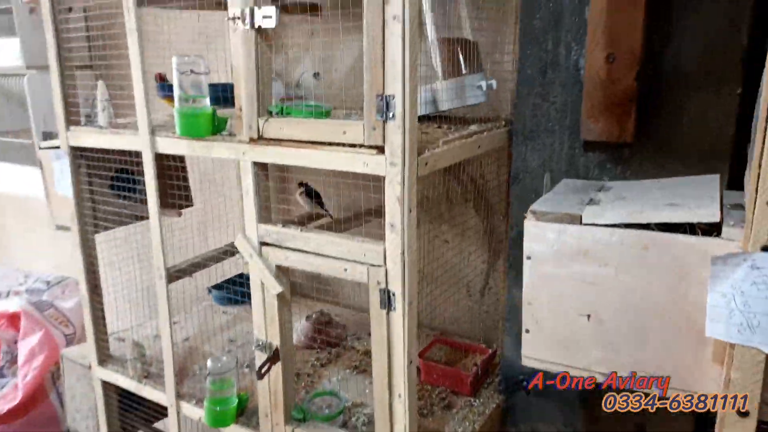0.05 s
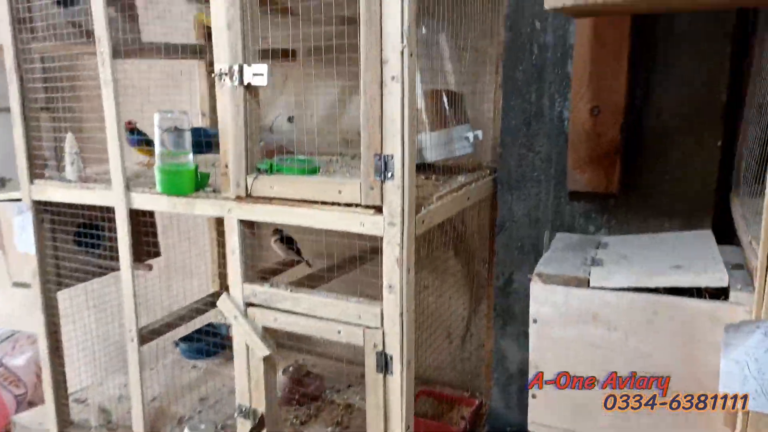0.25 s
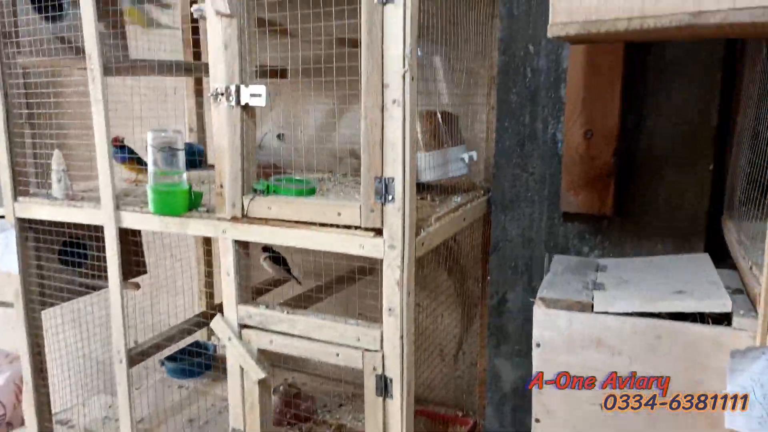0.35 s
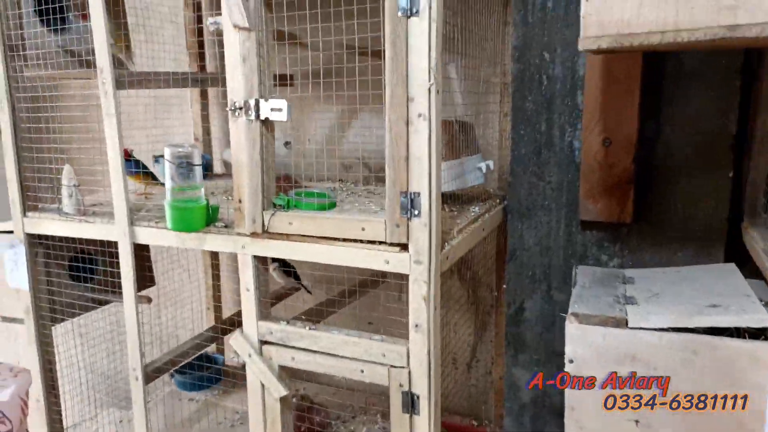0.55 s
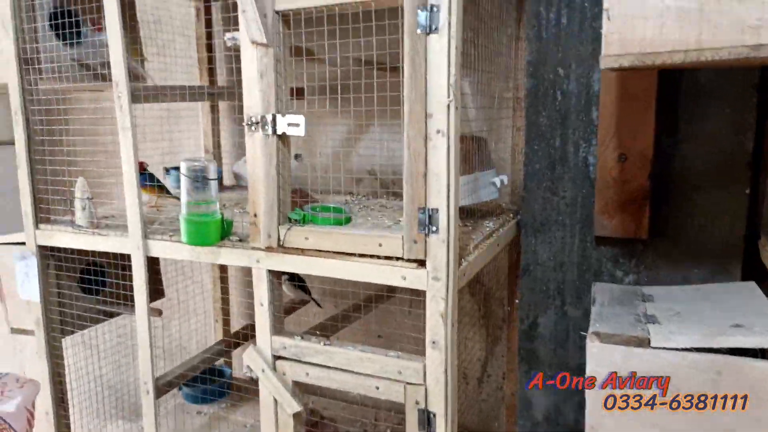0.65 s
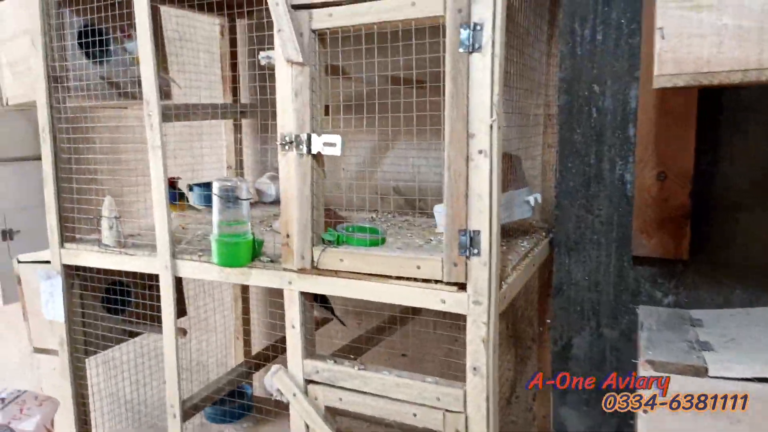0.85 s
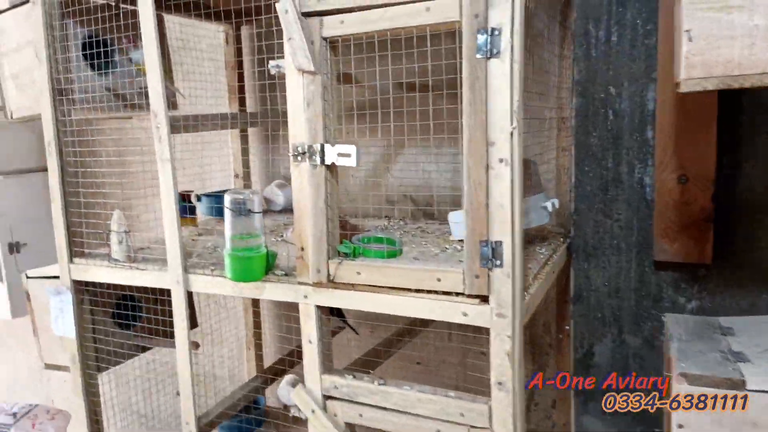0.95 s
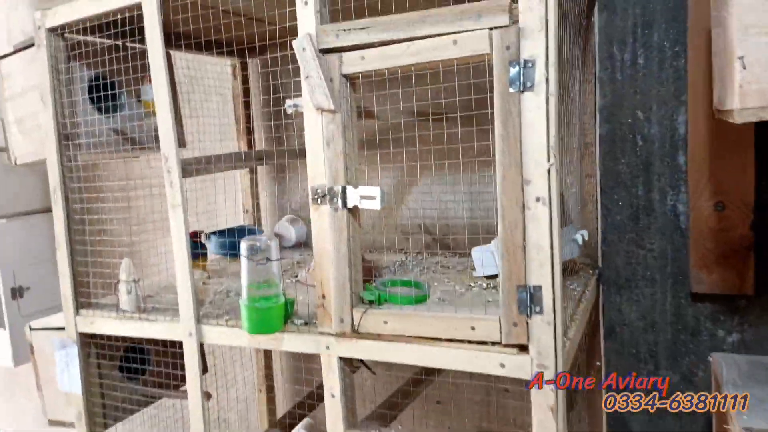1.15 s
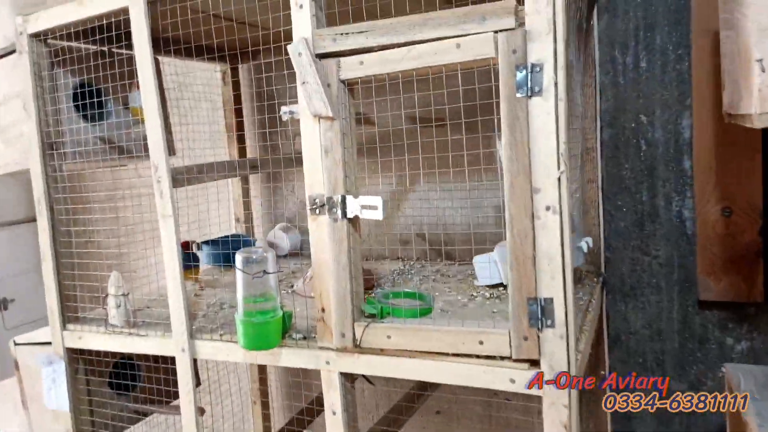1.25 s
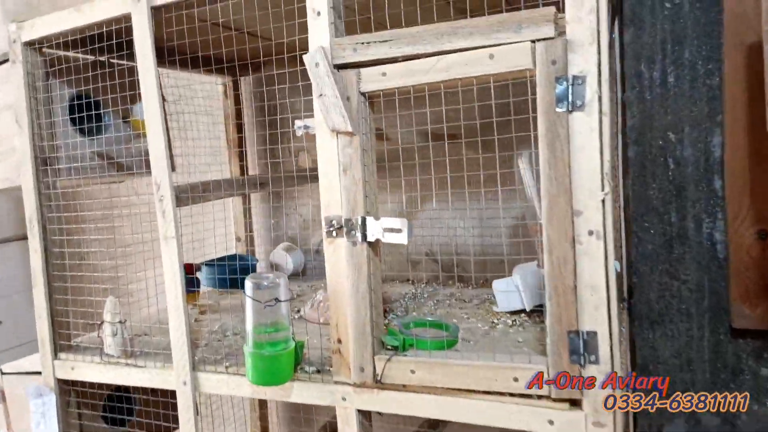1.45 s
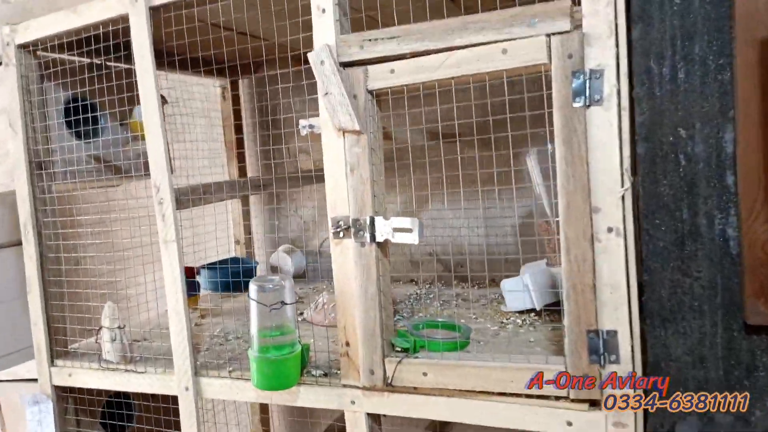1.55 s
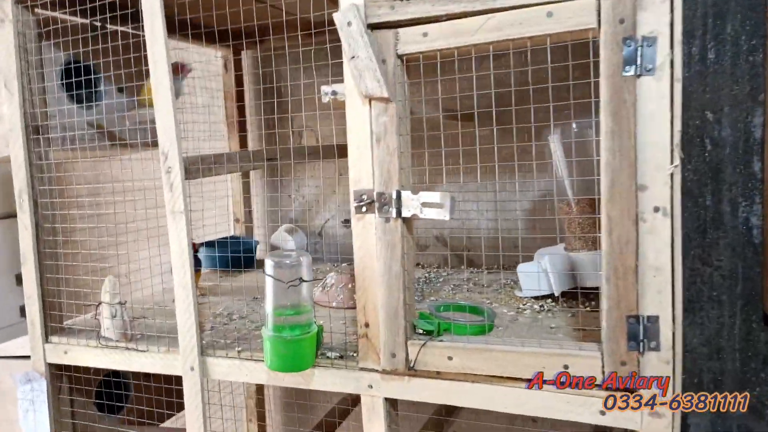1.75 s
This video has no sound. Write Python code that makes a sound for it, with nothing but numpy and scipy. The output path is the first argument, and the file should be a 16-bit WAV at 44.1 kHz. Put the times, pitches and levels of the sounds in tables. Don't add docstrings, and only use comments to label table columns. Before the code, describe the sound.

Harsh, buzzy chirps from a caged finch give way to short wavering whistles and soft nasal calls

```python
import sys
import numpy as np
from scipy import signal
from scipy.fft import rfft, irfft, next_fast_len
from scipy.io import wavfile
from scipy.ndimage import uniform_filter1d, map_coordinates

SR = 44100
rng = np.random.default_rng(int(sys.argv[2]) if len(sys.argv) > 2 else 0)


def attenuation_scalar(level_db):
    decades = np.asarray(level_db, float) / 20
    return 10 ** decades


def to_wav(s):
    ch = np.atleast_2d(s).T
    pcm = np.round(np.clip(ch, -1, 1) * 32767)
    wavfile.write(sys.argv[1], SR, pcm.astype(np.int16))


N = 79380
T = np.arange(N) / SR

# (start [s], level [dB], throat resonance [Hz], throat over
# beak [dB], sizzle over beak [dB])
RASPS = [(-.06, -57.5, 3330, 28, -13), (0.088, -53.5, 4030, -20, -29), (0.198, -22, 4200, -7, -18),
         (0.316, -20.5, 3950, -12, -14), (0.459, -21.5, 3850, -3.5, -18), (0.598, -26, 3680, 1.5, -34),
         (.695, -35.5, 3560, 0.5, -18), (.742, -26, 3840, 2.5, -35), (0.877, -24.5, 3150, 2.5, -17.5),
         (1.023, -32.5, 3970, 9.5, -36), (1.11, -37, 3430, 3.5, -14), (1.167, -28, 3990, 4, -24),
         (1.253, -29.5, 3670, 5, -21), (1.418, -34, 3200, 6, -24), (1.735, -57.5, 4540, 15, -5)]
# (frequency [Hz], width [Hz], level [dB])
BEAK_RESONANCES = [(5990, 650, 12.5), (5020, 2040, -2)]
# (frequency [Hz], level [dB])
SIZZLE_SPECTRUM = [(6500, 1), (7600, -6), (9000, -22), (10600, -1), (12600, 9), (14500, 9), (15900, 8)]
# (start [s], length [s], pitch [Hz], level [dB], lower resonance [Hz])
NASAL_CALLS = [
    (.0, .1, 553, -43, 2750),
    (1.505, .125, 530, -35, 3050),
    (1.74, .09, 612, -41, 2450),
]
# (start [s], length [s], pitch [Hz], level [dB])
WHISTLE_NOTES = [(.02, .085, 2800, -39), (.405, .04, 315, -35), (.68, .07, 3270, -41),
                 (.72, .03, 1780, -43), (.8, .045, 1330, -38), (1.1, .08, 3270, -35),
                 (1.195, .16, 4130, -19), (1.2, .11, 2280, -41), (1.24, .08, 3240, -28),
                 (1.445, .09, 3180, -25), (1.485, .05, 2870, -29), (1.64, .045, 1610, -47),
                 (1.775, .06, 3160, -34)]
# (frequency [Hz], decay time t60 [s])
ROOM_DECAY = [(300, 0.17), (3000, 0.6), (8000, 0.16), (15000, 0.033)]
# (frequency [Hz], level per Hz [dB])
CHATTER_SPECTRUM = [(800, -18.5), (1300, -8.5), (2500, 0.5), (4000, -6.5), (6000, -9.5), (8000, -24.5),
                    (10500, -26), (15800, -24.5)]
# (frequency [Hz], level per Hz [dB])
HUM_SPECTRUM = [(18, -23), (30, -29.5), (102, -4.5), (167, -3.5), (392, -17), (695, -20.5), (1140, -19),
                (1210, -18.5), (1500, -18), (1950, -20), (3300, -120)]
# (frequency [Hz], left-right correlation [-1..1])
PORT_LIKENESS = [(60, 0.65), (130, 1), (290, 0.78), (640, 0.82), (1410, -0.42), (3100, -0.18),
                 (6820, -0.45), (15000, 0.17)]
# (frequency [Hz], left minus right port [dB])
PORT_DIFFERENCE = [(300, -0.5), (1200, -4), (3400, -7), (5000, -13.5), (6200, -18), (7800, 10), (11000, 1),
                   (14000, -3.5), (15500, -3)]


def unit(x):
    return x / np.sqrt(np.mean(x ** 2) + 1e-20)


def along(points, hz):
    f, v = np.transpose(points)
    return np.interp(np.log(hz + 1), np.log(f + 1), v)


def wobble(rate):
    knots = rng.standard_normal(int(N * rate / SR) + 4)
    return map_coordinates(knots, [T * rate])


def filtered(x, response):
    m = next_fast_len(N + 8192)
    return irfft(rfft(x, m) * response(np.fft.rfftfreq(m, 1 / SR)), m)[..., :N]


def resonance(f, hz, width_hz):
    return (f * width_hz) ** 2 / ((hz * hz - f * f) ** 2 + (f * width_hz) ** 2)


def syrinx():
    pulse_hz, jitter, scatter_db, breath_share = 428, 0.3, 0.5, 0.72
    cycles = np.cumsum(pulse_hz * np.exp(jitter * wobble(300))) / SR
    cycle_sizes = attenuation_scalar(scatter_db * rng.standard_normal(N // 20))
    sizes = cycle_sizes[cycles.astype(int)]
    snaps = np.diff(np.floor(cycles), prepend=0) * sizes
    puffs = sizes * np.exp(-2.5 * (cycles % 1)) * rng.standard_normal(N)
    return np.sqrt(1 - breath_share) * unit(snaps) + np.sqrt(breath_share) * unit(puffs)


def rasps():
    attack_s, throat_attack_s, hold_s = 0.024, 0.038, 0.068
    release_db_per_s, throat_closes_db_per_s = 267, 105
    throat_width_hz, chest_hz, chest_width_hz, chest_db = 1100, 2720, 1540, -16
    source, out = syrinx(), np.zeros(N)
    beak = unit(filtered(source, lambda f: sum(attenuation_scalar(db) * resonance(f, hz, w) for hz, w, db in BEAK_RESONANCES)))
    sizzle = unit(filtered(source, lambda f: attenuation_scalar(along(SIZZLE_SPECTRUM, f))))
    for start, db, throat_hz, throat_db, sizzle_db in RASPS:
        throat = unit(filtered(source, lambda f: resonance(f, throat_hz, throat_width_hz)
                               + attenuation_scalar(chest_db) * resonance(f, chest_hz, chest_width_hz)))
        since_hold = np.clip(T - start - hold_s, 0, 1)
        fade = attenuation_scalar(db - release_db_per_s * since_hold)
        beak_opens = np.clip((T - start) / attack_s, 0, 1) ** 0.81
        throat_opens = np.clip((T - start) / throat_attack_s, 0, 1) ** 0.81
        throat_gain = attenuation_scalar(throat_db - throat_closes_db_per_s * since_hold)
        late = throat_gain * throat + attenuation_scalar(sizzle_db) * sizzle
        out += fade * (beak_opens * beak + throat_opens * late)
    return out


def note(start, length, hz, waver):
    edge_s, sag_per_s = 0.018, 0.3
    shape = np.clip(np.minimum(T - start, (start + length - T) / 2) / edge_s, 0, 1)
    pitch = hz * (1 - sag_per_s * np.clip(T - start, 0, length) + waver * wobble(120))
    return shape, 2 * np.pi * np.cumsum(pitch) / SR


def nasals():
    width_hz, upper_hz, upper_db, scatter_db = 700, 4330, 0, 3
    out = np.zeros(N)
    for start, length, hz, db, lower_hz in NASAL_CALLS:
        shape, phase = note(start, length, hz, waver=0.006)
        stack = np.zeros(N)
        for k in range(3, 13):
            colour = resonance(k * hz, lower_hz, width_hz) + attenuation_scalar(upper_db) * resonance(k * hz, upper_hz, width_hz)
            stack += colour * attenuation_scalar(scatter_db * wobble(40.2)) * np.sin(k * phase + k * k)
        out += attenuation_scalar(db) * shape * unit(stack)
    return out


def whistles():
    flutter_db, octave_db = 4.5, -56
    out = np.zeros(N)
    for start, length, hz, db in WHISTLE_NOTES:
        shape, phase = note(start, length, hz, waver=0.018)
        tone = np.sin(phase) + attenuation_scalar(octave_db) * np.sin(2 * phase)
        out += attenuation_scalar(db + flutter_db * wobble(90)) * shape * tone
    return out


def echoes(x, tail, db):
    return attenuation_scalar(db) * signal.fftconvolve(x[None], tail / np.linalg.norm(tail, axis=1)[:, None], axes=1)


def space(x):
    renew_s, birds_db, left_direct_db = 0.12, -1, -20
    cage_t60_s, cage_left_right_db, room_db = 0.034, [[0], [-1.5]], -11
    step = round(renew_s * SR)
    x = np.pad(x, (step, 2 * step))
    out = np.zeros((2, N + 4 * step + SR))
    for i in range(0, N + step, step):
        piece = x[i:i + 2 * step] * np.hanning(2 * step)
        cage = rng.standard_normal((2, SR // 20)) * attenuation_scalar(-60 * T[:SR // 20] / cage_t60_s)
        hz, t, z = signal.stft(rng.standard_normal((2, SR // 2)), SR, nperseg=256)
        decay = attenuation_scalar(-60 * t / along(ROOM_DECAY, hz)[:, None])
        room = signal.istft(z * decay, SR, nperseg=256)[1]
        for wet in (echoes(piece, cage, cage_left_right_db), echoes(piece, room, room_db)):
            out[:, i:i + wet.shape[1]] += wet
    direct = x[step:step + N] * attenuation_scalar([[left_direct_db], [0]])
    return attenuation_scalar(birds_db) * (direct + out[:, step:step + N])


def diffuse(spectrum, patchy_db):
    z = signal.stft(rng.standard_normal((2, N)), nperseg=512)[2]
    patches = uniform_filter1d(rng.standard_normal(z.shape[1:]), size=5, axis=0)
    patches = uniform_filter1d(patches, size=8, axis=1)
    pair = signal.istft(z * attenuation_scalar(patchy_db * unit(patches)), nperseg=512)[1][:, :N]

    def mid_side_gain(hz):
        turn = np.arccos(np.clip(along(PORT_LIKENESS, hz), -1, 1)) / 2
        return attenuation_scalar(along(spectrum, hz)) * [np.cos(turn), np.sin(turn)]

    mid, side = filtered(pair, mid_side_gain)
    return unit(np.array([mid + side, mid - side]))


def chatter():
    return attenuation_scalar(-39) * diffuse(CHATTER_SPECTRUM, patchy_db=3.5)


def fan():
    return attenuation_scalar(-50.5 + 6.5 * wobble(5.76)) * np.sin(2 * np.pi * 115.7 * T + 0.81 * wobble(8))


def hum():
    return attenuation_scalar(-41.5) * diffuse(HUM_SPECTRUM, patchy_db=1.5)


def scene():
    tones_db = 4.3
    birds = space(rasps() + attenuation_scalar(tones_db) * (nasals() + whistles()))
    return birds + chatter() + fan() + hum()


def band_limit(x):
    return signal.sosfilt(signal.butter(12, 15960, fs=SR, output="sos"), x)


def record(dry):
    low_cut_hz, top_hz = 60, 15960

    def port_gain(f):
        shading = attenuation_scalar(np.outer([0.75, -0.25], along(PORT_DIFFERENCE, f)))
        return shading * (f < top_hz) * f * f / (f * f + low_cut_hz ** 2)

    return band_limit(filtered(dry, port_gain))


dry = scene()
out = record(dry)
to_wav(out)
```